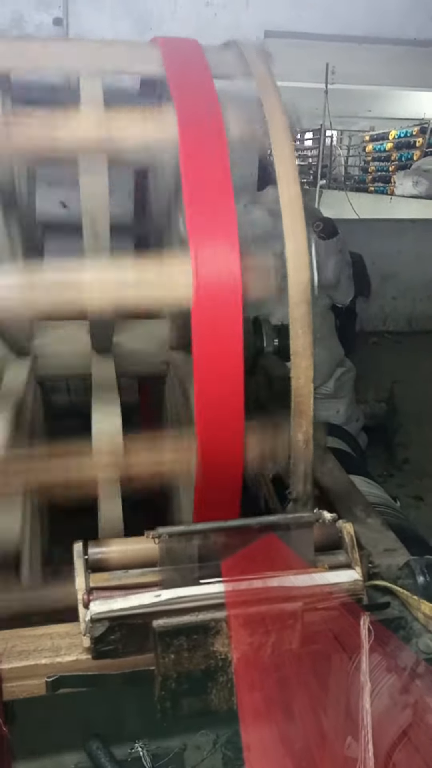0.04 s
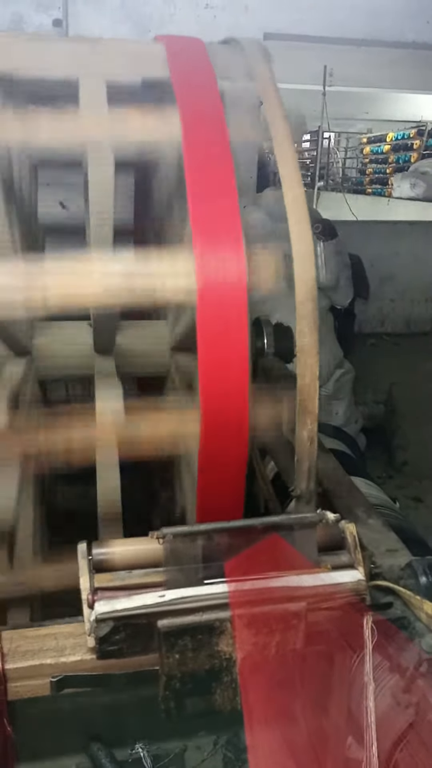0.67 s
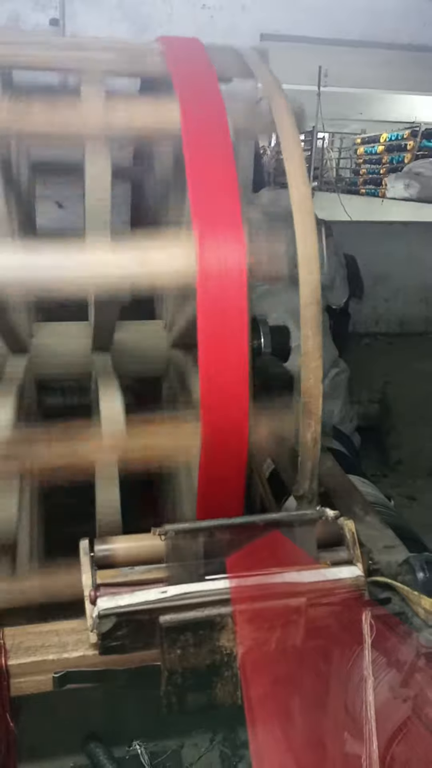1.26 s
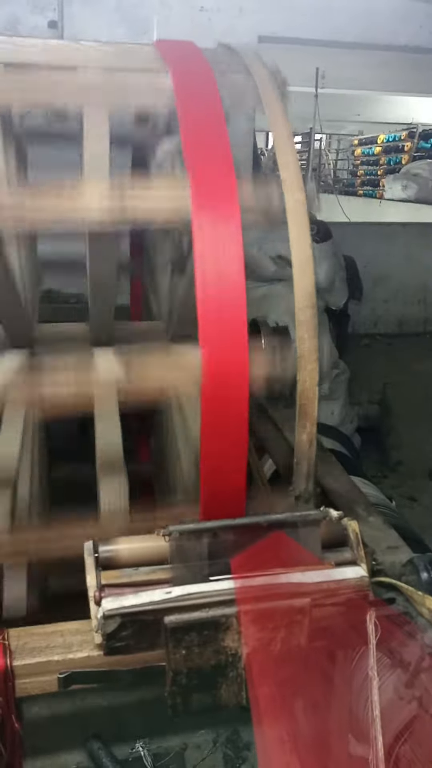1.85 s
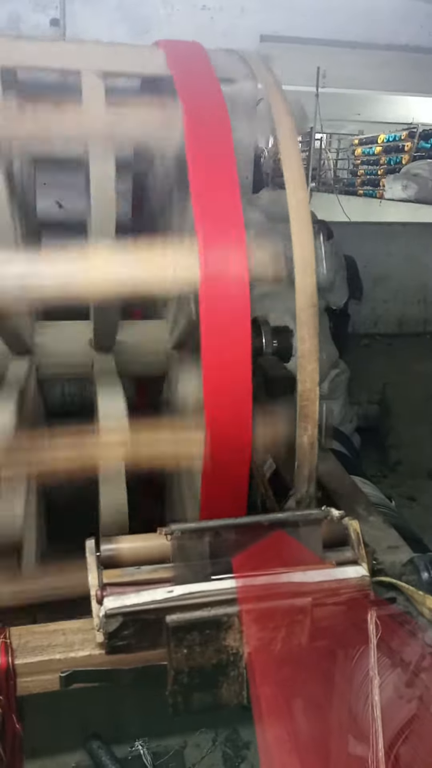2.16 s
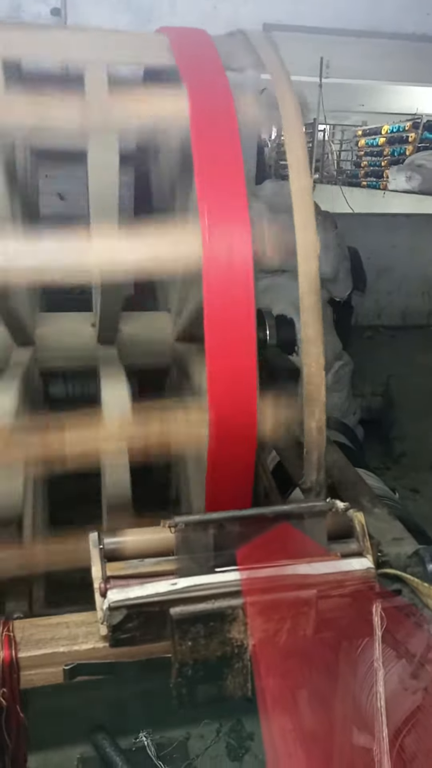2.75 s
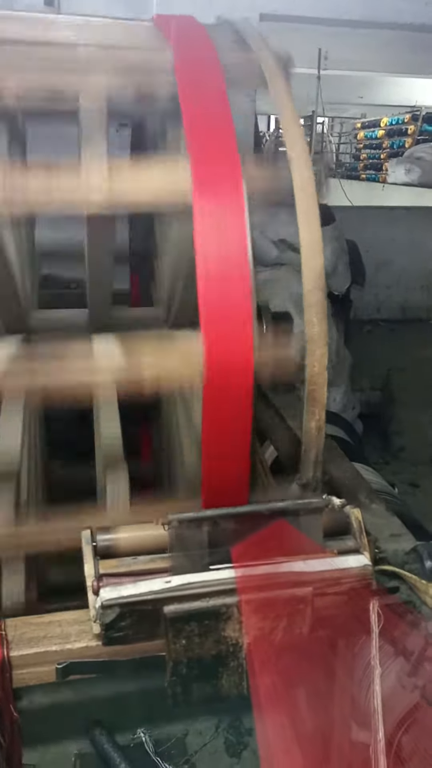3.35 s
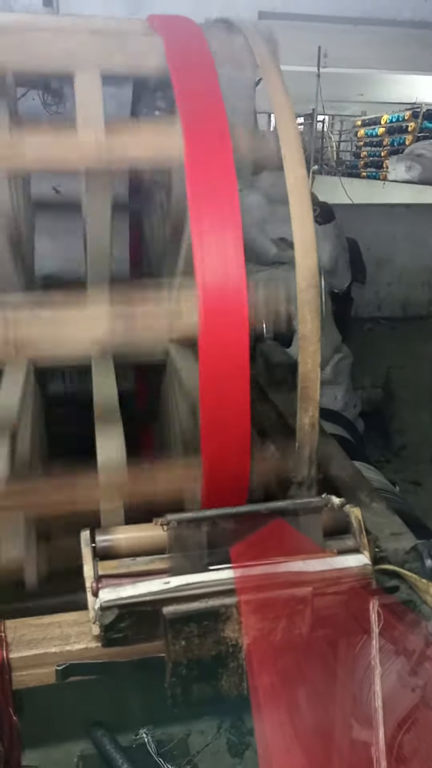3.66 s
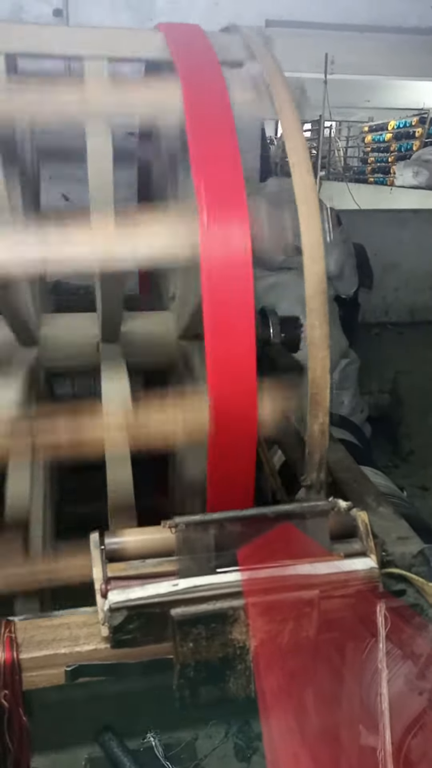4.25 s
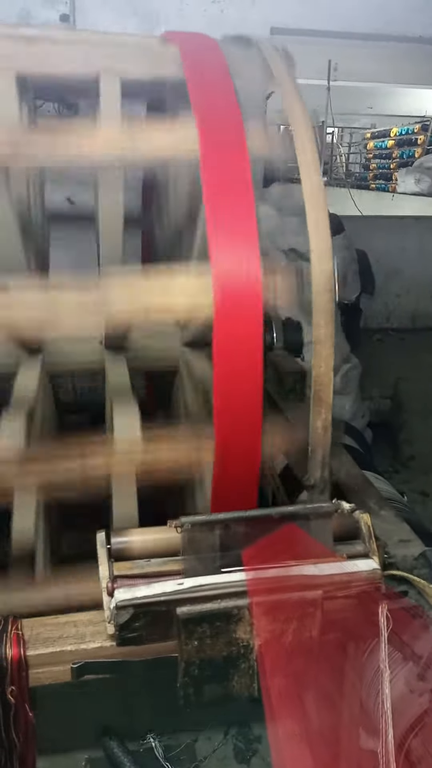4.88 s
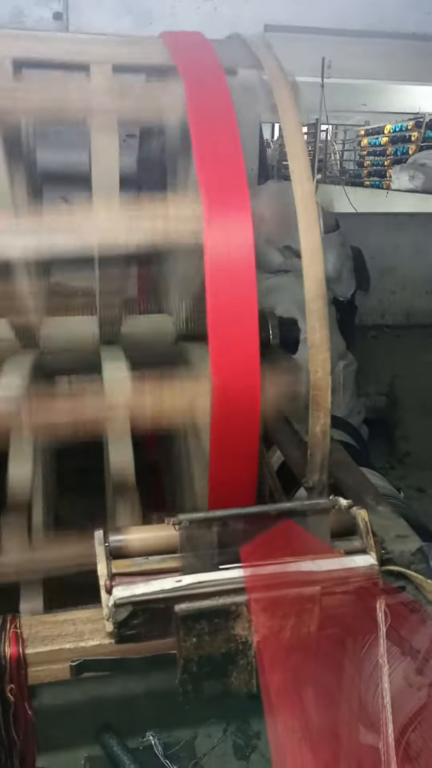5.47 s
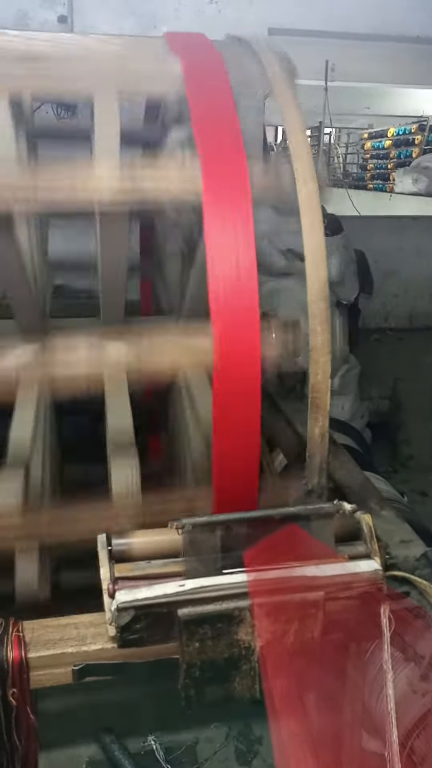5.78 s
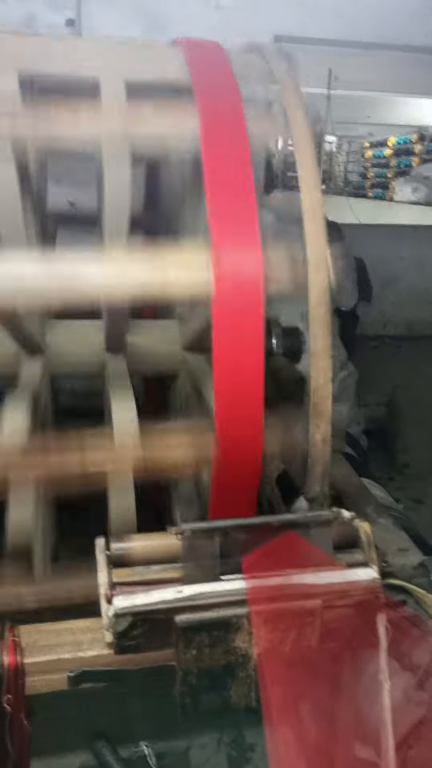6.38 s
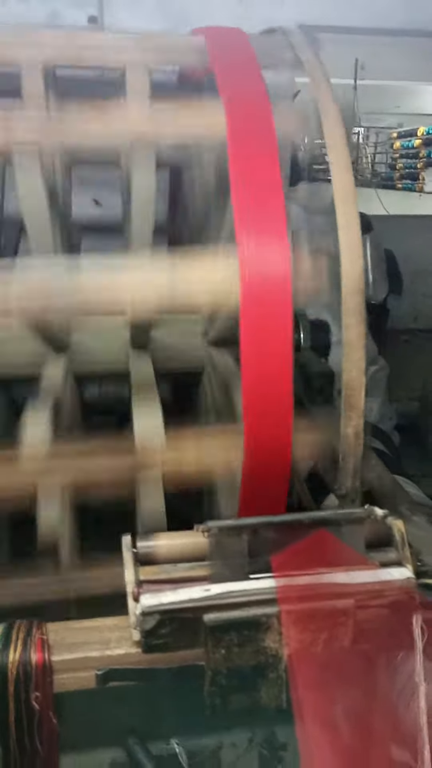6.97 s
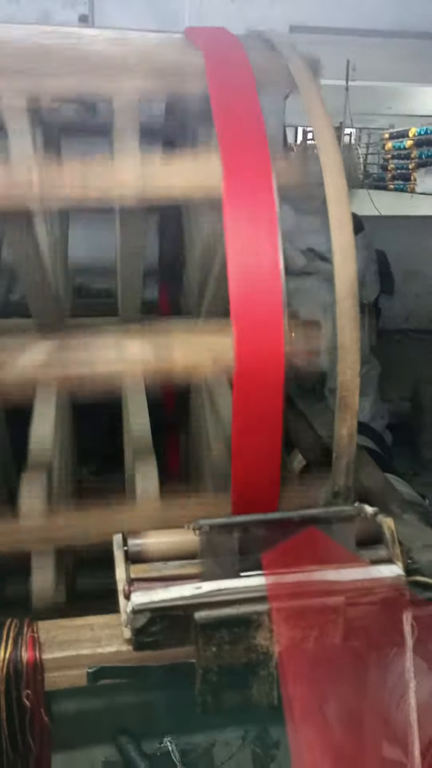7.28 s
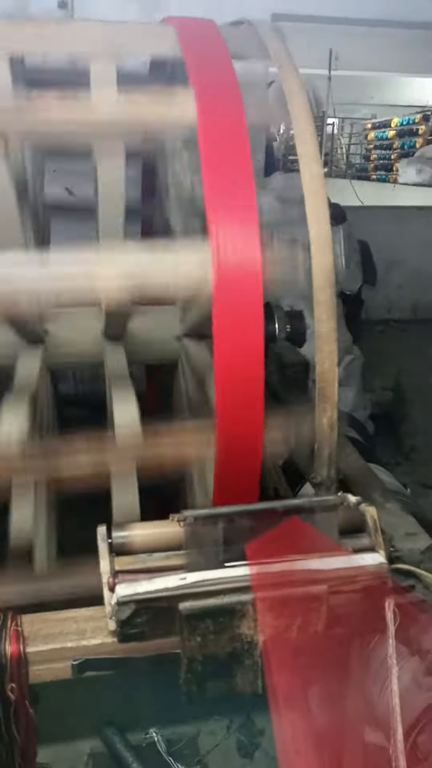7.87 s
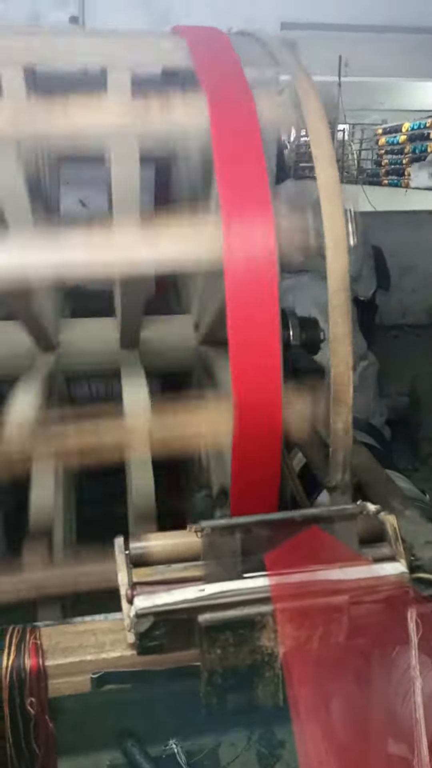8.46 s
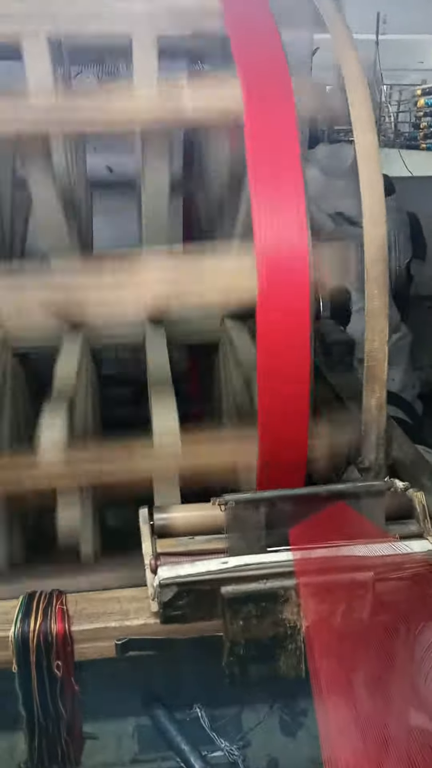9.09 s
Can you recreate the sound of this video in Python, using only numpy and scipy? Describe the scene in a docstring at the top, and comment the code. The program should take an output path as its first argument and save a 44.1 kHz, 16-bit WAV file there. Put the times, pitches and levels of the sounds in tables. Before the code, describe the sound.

A large slatted drum winds yarn in a workshop, making a continuous rushing hiss over a low roar of churned air. A little under twice a second it scrapes its steel frame, which rings briefly, with knocks, ticks and clinks of loose parts in between. Short squeaks come now and then. The microphone is close, and the tone turns slightly hollow toward the end.

```python
"""A workshop: a big slatted warping drum winds a band of yarn at about 100 turns a minute.
Once a turn it scrapes and rings the steel frame, which knocks and clinks in between. The running gear
heaves and ticks in a slightly faster cycle, so the two drift in and out of step. Yarn and bearings
rush without a break, with stray squeaks; the slats churn the air and the frame booms softly.
Late on, the phone moves and a close surface hollows the sound."""
import sys
import numpy as np
from scipy import signal
from scipy.fft import rfft, irfft
from scipy.io import wavfile
from scipy.ndimage import uniform_filter1d, map_coordinates

SR = 44100
rng = np.random.default_rng(int(sys.argv[2]) if len(sys.argv) > 2 else 0)


def to_wav(s):
    """Save 16-bit WAV."""
    ch = np.atleast_2d(s).T  # columns
    pcm = np.round(np.clip(ch, -1, 1) * 32767)  # PCM
    wavfile.write(sys.argv[1], SR, pcm.astype(np.int16))


N = 402633
T = np.arange(N) / SR
TURN_S, TURN_START_S, GEAR_S = .6012, .4035, .572
TICK_RISE_S = .003

# Noise spectra. Each row: frequency in Hz, relative density in dB.
AIR_SPECTRUM = [(20, -30), (36, -28), (62, -3), (85, -3), (150, 0.5), (205, -0.5), (330, 1), (500, -1),
                (700, -5.5), (1000, -2.5), (1600, -25.5)]
RUSH_SPECTRUM = [(450, -37), (800, -16.5), (1150, -9.5), (1360, -1.0), (1800, 0.5), (2600, -4),
                 (3300, -0.4), (5200, -6), (6700, -6.5), (8100, -14), (9200, -13), (9400, -7), (9600, -15),
                 (10200, -13.5), (12600, -27), (13900, -33), (15000, -26)]
GRIND_SPECTRUM = [(300, -15), (1000, -9.5), (1400, -3), (2700, 0), (4600, -0.5), (6300, -1), (8200, -11.5),
                  (10400, -9), (13300, -34), (15500, -24)]
YARN_SPECTRUM = [(1500, -14.5), (4500, -9.5), (6500, 7.5), (8200, -1), (10000, 2.5), (11600, -0.5),
                 (12800, -17), (13900, -11), (15000, -7)]
SNAP_SPECTRUM = [(3000, -10.5), (6500, -1.5), (8200, -2), (10000, 4), (12000, -9), (13500, -14),
                 (15300, -3.5)]
SCRAPE_SPECTRUM = [(300, -13), (1000, -10), (1400, -2), (2100, 0), (2700, 0), (3550, -1), (4500, 0),
                   (5900, 1), (6900, -1), (8200, -10), (10400, -12), (13300, -33), (15500, -19)]

# Slow drift. Each row: time in seconds, base rubbing in dB, yarn hiss in dB.
MACHINE_DRIFT = [(0, -38, -53), (2.4, -36, -48.5), (3.9, -35.5, -49), (5.3, -35.5, -50), (6.2, -36.5, -49),
                 (6.8, -35.5, -66), (7.6, -34, -55), (8.2, -35, -44), (9.13, -35.5, -51)]
# Load peaks per drum turn and gear cycle. Each row: offset in seconds, lift in dB, decay in seconds.
DRUM_LOAD_PEAKS = [(.01, 1.5, 0.058), (.25, 0.8, 0.032)]
GEAR_LOAD_PEAKS = [(.027, 3, 0.11), (.262, 1, 0.015)]
# Brief easing of the rubbing. Each row: centre in seconds, change in dB, length in seconds.
RUB_LULLS = [(0.03, -2.5, 0.045), (0.34, -2, 0.049), (1.368, -0.5, .08), (1.895, -3, .11),
             (2.128, -3, 0.071), (2.734, -5, 0.12), (3.248, -2.5, 0.12), (3.83, -5, 0.12),
             (4.397, -2, 0.083), (5.017, -3.5, .13), (5.675, -2, .08), (7.386, -2, .11), (8.485, 0, .1)]
# Frame booms. Each row: centre in seconds, pitch in Hz, relative level in dB.
FRAME_BOOMS = [(.05, 343, -44.5), (.28, 255, -45), (.575, 91, -51), (.725, 253, -44.5), (1.79, 102.3, -50),
               (1.805, 354, -42.5), (1.97, 75, -51), (2.17, 75, -53), (2.21, 130, -49), (2.66, 463, -47),
               (2.755, 141, -48), (2.93, 350, -42.5), (3.07, 306, -47.5), (2.985, 133, -47),
               (3.155, 164, -42.5), (4.64, 89.5, -49), (5.24, 510, -48), (5.25, 984, -47),
               (5.255, 157, -43), (5.43, 150, -49), (6.51, 80, -47.5), (6.6, 68, -51), (6.9, 85, -48),
               (8.70, 320, -43.5)]
# Dry bearing tones. Each row: pitch in Hz, level in dB.
BEARING_TONES = [(2115, -66), (6335, -67), (11100, -75), (12257, -77)]
# Rubbing metal. Each row: centre in seconds, pitch in Hz, level in dB, length in seconds.
METAL_SQUEAKS = [(.452, 3790, -37.5, .075), (.72, 1378, -41, .05), (1.76, 2105, -39.5, .063),
                 (3.42, 9380, -43, .06), (3.73, 6335, -35, .052), (4.328, 6335, -41.5, .04),
                 (5.2, 2164, -39, .063), (5.85, 1610, -33.5, .063), (6.372, 3610, -38, .063),
                 (6.45, 1378, -42, .063), (6.605, 11110, -46, .063), (6.63, 1370, -41, .063),
                 (8.10, 1960, -36.5, .063), (8.635, 2116, -35.5, .055), (8.70, 1395, -37, .075)]
# Ticks per drum turn and gear cycle. Each row: offset in seconds, level in dB.
DRUM_CYCLE_TICKS = [(.005, -45.5), (.25, -49), (.425, -61)]
GEAR_CYCLE_TICKS = [(.037, -50), (.062, -58), (.295, -48.5), (.397, -51), (.565, -47)]
# Yarn snapping over the guide. Each row: start in seconds, level in dB.
YARN_SNAPS = [(.047, -46), (.424, -36.5), (.885, -39), (1.2, -43), (1.565, -37), (3.411, -42), (3.828, -38),
              (4.034, -35.5), (4.267, -36), (4.612, -39), (5.184, -38), (5.781, -36), (6.331, -42),
              (8.045, -37), (8.232, -35)]
# Struck steel: loose parts clink, and the frame itself rings near 2.5 kHz at some scrapes. Each row: start in
# seconds, pitch in Hz, level in dB, T60 in seconds.
STEEL_CLINKS = [(.115, 4530, -43, .2), (.125, 2900, -43, .2), (.615, 6212, -41, .2), (.885, 2830, -40, .15),
                (1.025, 2379, -32.5, .19), (1.03, 5190, -38.5, .15), (1.14, 4330, -42, .22),
                (1.195, 3510, -41, .17), (1.765, 4630, -41, .2), (2.235, 1938, -39, .2),
                (2.814, 2625, -33, .22), (2.882, 3058, -38, .2), (2.895, 4737, -38.5, .33),
                (2.92, 3220, -38.5, .2), (3.425, 5190, -40, .15), (3.447, 4680, -40, .17),
                (3.465, 5609, -39, .18), (3.485, 4447, -36, .2), (4.02, 2670, -37, .16),
                (4.035, 2089, -32, .18), (4.028, 3133, -35.5, .22), (4.033, 4737, -38, .17),
                (4.05, 4436, -37, .2), (4.075, 1658, -38, .28), (4.125, 4450, -37, .28),
                (4.145, 3714, -37, .3), (4.625, 3230, -37.5, .2), (4.637, 2584, -36, .22),
                (4.62, 5600, -39.5, .16), (4.725, 3200, -37.5, .28), (5.225, 2541, -37.5, .18),
                (5.24, 4188, -39, .2), (5.275, 3310, -37, .33), (5.39, 3240, -41, .25),
                (5.818, 2541, -40, .17), (5.962, 4737, -39.5, .22), (6.14, 6008, -39.5, .18),
                (6.425, 4748, -38, .2), (6.445, 2575, -35.5, .22), (6.472, 4608, -38.5, .2),
                (7.033, 2575, -37, .22), (7.632, 2615, -31.5, .22), (7.63, 5986, -36, .16),
                (8.255, 3230, -37.5, .3)]
# Steel frame modes. Each row: frequency in Hz, relative level in dB, T60 in seconds.
FRAME_MODES = [(1387, -3, 0.24), (1657, -1.5, 0.23), (2120, -2.5, 0.13), (2580, 0, 0.19), (3130, -8, 0.16),
               (3260, -3, 0.25), (3760, -5, 0.13), (4390, -5, 0.22), (4715, -2, .22), (5250, -6, .15),
               (5620, -8, 0.25), (5990, -3, .18), (6100, -13, .16)]
# Knocks between scrapes. Each row: start in seconds, level in dB, decay in seconds.
FRAME_KNOCKS = [(.505, -35, 0.079), (.66, -37, .05), (1.075, -38, .02), (1.4, -37, .05), (1.74, -37, .03),
                (1.975, -39, 0.056), (2.268, -41, .025), (2.485, -38.5, 0.07), (3.1, -37, 0.044),
                (3.148, -41, .025), (3.585, -44, 0.028), (3.685, -37, .045), (4.49, -39, .025),
                (4.675, -40, 0.016), (4.725, -45, .025), (5.18, -34, 0.035), (5.5, -42, .08),
                (6.3, -35, .03), (6.357, -34.5, 0.028), (6.891, -44, .03), (7.44, -41, .03),
                (7.545, -38, .05), (7.702, -38, .025), (8.08, -42, .03), (8.361, -35, 0.034),
                (8.68, -36.5, 0.041)]
# One scrape a turn. Each row: start in seconds, level in dB, rise in seconds, decay in seconds.
DRUM_SCRAPES = [(.406, -35.5, 0.023, .025), (1.013, -30, 0.016, 0.04), (1.612, -33, 0.0083, 0.057),
                (2.192, -32.5, 0.007, 0.092), (2.809, -31, .006, 0.1), (3.408, -33.5, 0.0073, 0.065),
                (4.014, -28, 0.023, 0.038), (4.6, -33, .026, 0.04), (5.215, -31.5, .014, 0.059),
                (5.798, -33, 0.036, 0.049), (6.406, -32, 0.027, 0.043), (7.012, -33.5, 0.022, 0.055),
                (7.628, -30, 0.0034, .032), (8.222, -31, 0.01, 0.035), (8.835, -33.5, 0.01, .04)]
# Hard surfaces near the phone. Each row: time in seconds, echo lag in ms, signed echo gain,
# treble relative to bass in dB.
SURFACE_ECHO = [(0, .11, 0.13, 0.5), (1.3, 0.09, 0.13, 0), (2.1, 0.097, 0.026, 0),
                (6.1, 0.55, 0.0061, -0.5), (6.5, 0.47, -0.13, 0), (7.1, 0.47, -0.13, -1.5),
                (7.6, 0.41, -0.1, -2.3), (8.0, 0.34, -0.16, -2.5), (8.4, 0.35, -0.17, -3),
                (9.13, 0.35, -0.067, -5.5)]
# Dips cut by the close surface. Each row: time in seconds, dip in Hz, depth 0-1, upper dip depth 0-1.
SURFACE_DIPS = [(6.2, 2400, 0, 0.1), (6.7, 2550, .25, 0), (7.05, 2480, 0.34, 0), (7.4, 2760, 0.5, 0),
                (7.8, 2970, .3, 0), (8.2, 3170, .1, .3), (8.7, 3300, .2, 0.27), (9.13, 3400, 0.4, .3)]


def undb(db):
    """Decibels to gain."""
    return 10 ** (np.asarray(db) / 20)


def unit(x):
    """Scale to rms 1."""
    return x / np.sqrt(np.mean(x ** 2))


def lowpass(x, order, hz):
    """Zero-phase low-pass."""
    return signal.sosfiltfilt(signal.butter(order, hz, fs=SR, output="sos"), x)


def band(x, hz, width_hz):
    """Band-pass around a moving centre."""
    carrier = np.exp(2j * np.pi * np.cumsum(hz) / SR)
    return 2 * np.real(carrier * lowpass(x / carrier, 1, width_hz / 2))


def curves(table):
    """Table columns, interpolated over time."""
    times_s, *columns = np.transpose(table)
    return [np.interp(T, times_s, column) for column in columns]


def walk(rate_hz):
    """Smoothed random steps; spread near 1."""
    hold = int(SR / rate_hz)
    steps = np.repeat(rng.standard_normal(N // hold + 2), hold)[rng.integers(hold):][:N]
    return 1.3 * uniform_filter1d(uniform_filter1d(steps, hold), hold)


def colour(x, spectrum):
    """Filter by (Hz, dB) points; rms 1."""
    hz, db = np.transpose(spectrum)
    bins_hz = np.arange(N // 2 + 1) * SR / N + 1
    gain = undb(np.interp(np.log(bins_hz), np.log(hz), db))
    return unit(irfft(rfft(x) * gain, N))


def noise(spectrum):
    """Coloured noise; rms 1."""
    return colour(rng.standard_normal(N), spectrum)


def flicker(x, low_hz, high_hz, depth_db, rate_hz, count):
    """Overlapping bands rise and fall independently; rms 1."""
    bins_hz = np.arange(N // 2 + 1) * SR / N + 1
    position = np.interp(np.log(bins_hz), np.log([low_hz, high_hz]), [0, count - 1])
    spectrum = rfft(x)
    bands = (irfft(spectrum * np.maximum(1 - np.abs(position - k), 0), N) for k in range(count))
    return unit(sum(part * undb(depth_db * walk(rate_hz)) for part in bands))


def wavering_tone(hz, bend, rate_hz):
    """Sine whose pitch wanders by the fraction bend."""
    return np.sin(2 * np.pi * np.cumsum(hz * (1 + bend * walk(rate_hz))) / SR)


def stroke(t, rise_s, decay_s):
    """Linear rise from t = 0, exponential fall."""
    return np.clip(t / rise_s, 0, 1) * np.exp(-np.maximum(t - rise_s, 0) / decay_s)


def cycles(drum_rows, gear_rows):
    """Rows with each offset replaced by the time since it last came round."""
    drum = [((T - TURN_START_S - s) % TURN_S, *rest) for s, *rest in drum_rows]
    gear = [((T - s) % GEAR_S, *rest) for s, *rest in gear_rows]
    return drum + gear


def slips(per_s, spread_db):
    """Tiny friction slips of uneven size; rms 1."""
    impulses = (rng.random(N) < per_s / SR) * rng.choice([-1, 1], N)
    return unit(impulses * undb(spread_db * rng.standard_normal(N)))


def swells(rows, wander_hz, rough):
    """Narrow resonances swell and die: part tone, part rasp."""
    out = np.zeros(N)
    phase_drift = np.cumsum(wander_hz * walk(90)) / SR
    flutter = np.sqrt(1 - rough) + np.sqrt(rough / 2) * (walk(170) + 1j * walk(170))
    for centre_s, hz, db, length_s in rows:
        near = np.abs(T - centre_s) < 2 * length_s
        t = T[near] - centre_s
        tone = np.sqrt(2) * np.imag(flutter[near] * np.exp(2j * np.pi * (hz * t + phase_drift[near])))
        out[near] += undb(db) * np.exp(-(2 * t / length_s) ** 2) * tone
    return out


def rings(rows, max_split_hz=56, twin_gain=.51, rise_s=.0044):
    """Struck steel: each fading tone beats with a weaker neighbour."""
    out, t = np.zeros(N + SR), T[:SR // 4]
    attack = 1 - np.exp(-t / rise_s)
    for start_s, hz, db, t60_s in rows:
        phase, twin_phase, split = rng.random(3)
        twin_hz = hz + max_split_hz * (2 * split - 1)
        tone = np.sin(2 * np.pi * (hz * t + phase))
        twin = twin_gain * np.sin(2 * np.pi * (twin_hz * t + twin_phase))
        i = min(int(start_s * SR), N - 1)
        out[i:i + len(t)] += np.sqrt(2) * (tone + twin) * attack * undb(db - 60 * t / t60_s)
    return out[:N]


def rubbing():
    """Rubbing strength in dB: drum and gear heaves add in power, with brief lulls."""
    heaves = sum((undb(db) ** 2 - 1) * stroke(t, .021, decay_s)
                 for t, db, decay_s in cycles(DRUM_LOAD_PEAKS, GEAR_LOAD_PEAKS))
    lulls_db = sum(db * np.exp(-(2 * (T - s) / length_s) ** 2) for s, db, length_s in RUB_LULLS)
    base_db, _ = curves(MACHINE_DRIFT)
    return base_db + 10 * np.log10(1 + heaves) + lulls_db + .51 * walk(18)


def churned_air(load_db):
    """Slats churn the air: a low roar that heaves with the load, its deepest part in puffs."""
    air = flicker(noise(AIR_SPECTRUM), 66, 690, depth_db=2.5, rate_hz=13, count=6)
    puffs = lowpass(air, 2, hz=90) * (undb(2.1 * walk(6.6) - 3.5) - 1)
    return (air + puffs) * undb(-50 + .34 * load_db)


def frame_booms(low_hz=109.6, high_hz=480, length_s=.065):
    """The frame booms softly, with a few fainter strays at random."""
    strays = [(when * N / SR, low_hz * (high_hz / low_hz) ** pitch, -50 - 5 * size)
              for when, pitch, size in rng.random((8, 3))]
    rows = [(*row, length_s) for row in FRAME_BOOMS + strays]
    return undb(-2.5) * swells(rows, wander_hz=25.1, rough=.56)


def bearing():
    """A dry bearing sings faintly and unsteadily."""
    return sum(undb(db + 3.2 * walk(13)) * np.sqrt(2) * wavering_tone(hz, bend=.00593, rate_hz=150)
               for hz, db in BEARING_TONES)


def rush(load_db):
    """Threads and bearings rub nonstop; high load adds brighter, stuttering grinding."""
    steady = flicker(noise(RUSH_SPECTRUM), 1080, 9000, depth_db=1.02, rate_hz=22, count=7)
    grinding = noise(GRIND_SPECTRUM) * undb(-46 + 1.66 * load_db + 2.7 * walk(40))
    return steady * undb(-35.5 + .62 * load_db + .5 * walk(25)) + grinding


def squeaks():
    """Rubbing metal squeaks briefly."""
    return swells(METAL_SQUEAKS, wander_hz=25.97, rough=.38)


def yarn_hiss():
    """Yarn hisses through reed and guide; ticks come round with drum and gear."""
    ticks = sum(undb(db) * stroke(t, TICK_RISE_S, decay_s=.018)
                for t, db in cycles(DRUM_CYCLE_TICKS, GEAR_CYCLE_TICKS))
    _, hiss_db = curves(MACHINE_DRIFT)
    envelope = undb(hiss_db + 2 * walk(45)) + ticks * undb(2.1 * walk(16))
    return envelope * noise(YARN_SPECTRUM)


def yarn_snaps(load_db, rise_s=.005, decay_s=.008, crackle_per_s=36):
    """Taut threads jump on the guide: sharp ticks over a crackle that follows the load."""
    sharp = sum(undb(db) * stroke(T - s, rise_s, decay_s) for s, db in YARN_SNAPS)
    jumps = np.abs(slips(crackle_per_s, spread_db=3.5)) * np.sqrt(crackle_per_s / SR)
    crackle = signal.fftconvolve(jumps, stroke(T[:SR // 10], rise_s, decay_s))[:N]
    return (sharp + undb(load_db - 47.5) * crackle) * noise(SNAP_SPECTRUM)


def clinks(starts_s, rub_db):
    """Small steel parts of random pitch, size and damping; louder under hard rubbing."""
    pitch, smallness, sustain = rng.random((len(starts_s), 3)).T
    hz = 1900 + 3500 * pitch
    db = np.interp(starts_s, T, rub_db) - 3.5 - 12 * smallness - 3 * pitch
    t60_s = .087 + .15 * sustain
    return rings(zip(starts_s, hz, db, t60_s))


def jingle(rub_db, count=260):
    """Loose parts shake all the time."""
    return clinks(rng.random(count) * N / SR, rub_db)


def clank(rub_db, per_scrape=6):
    """Each scrape shakes out a flurry of clinks."""
    starts_s = np.repeat([s for s, *_ in DRUM_SCRAPES], per_scrape)
    lags_s = .0087 + rng.exponential(.05, len(starts_s))
    return clinks(starts_s + lags_s, rub_db)


def frame_singing(force, rub_db):
    """Rubbing sustains the frame's modes; the moving contact feeds each unevenly and bends its pitch."""
    drive = undb(-19.5) * force + undb(rub_db - 23)
    out = np.zeros(N)
    for hz, db, t60_s in FRAME_MODES:
        pole = np.exp(-np.log(1000) / t60_s / SR)
        push = drive * undb(4.8 * walk(3.09)) * rng.standard_normal(N)
        amplitude = np.sqrt(1 - pole ** 2) * signal.lfilter([1], [1, -pole], push)
        out += undb(db) * amplitude * wavering_tone(hz, bend=.006, rate_hz=6)
    return out


def frame_strikes(ring_db=-14.5, scatter_db=2.5):
    """Each scrape and knock strikes all frame modes in a new mix."""
    blows = [(s + rise_s / 2, db) for s, db, rise_s, _ in DRUM_SCRAPES]
    blows += [(s, db) for s, db, _ in FRAME_KNOCKS]
    rows = []
    for start_s, blow_db in blows:
        for hz, mode_db, t60_s in FRAME_MODES:
            size, bend = rng.standard_normal(2)
            db = blow_db + mode_db + ring_db + scatter_db * size
            rows.append((start_s, hz * (1 + .0073 * bend), db, t60_s))
    return rings(rows)


def clack(relative_db=-12, lag_s=.0037):
    """One crisp snap just after each scrape's peak, scaled to it."""
    envelope = sum(undb(db + relative_db) * stroke(T - s - rise_s - lag_s, TICK_RISE_S, decay_s=.008)
                   for s, db, rise_s, _ in DRUM_SCRAPES)
    return envelope * noise(YARN_SPECTRUM)


def contact_force():
    """Once a turn the drum bears on its rubbing spot, chatters and lets go; the frame knocks between."""
    scrapes = sum(undb(db) * stroke(T - s, rise_s, decay_s) for s, db, rise_s, decay_s in DRUM_SCRAPES)
    knocks = sum(undb(db) * stroke(T - s, .005, decay_s) for s, db, decay_s in FRAME_KNOCKS)
    return (scrapes + knocks) * undb(walk(110))


def drum_scrape(force, blur_s=.0043):
    """Chattering slips, blurred by first reflections off drum and walls."""
    t = T[:SR // 20]
    reflections = rng.standard_normal(len(t)) * np.exp(-t / blur_s)
    chatter = signal.fftconvolve(slips(per_s=9000, spread_db=2), reflections)[:N]
    return force * colour(chatter, SCRAPE_SPECTRUM)


def surface_echo(x):
    """A very short echo combs the sound as the phone shifts; the balance tilts away from the treble."""
    lag_ms, echo_gain, treble_db = curves(SURFACE_ECHO)
    low = lowpass(x, 4, hz=2800)
    tilted = (low + undb(treble_db) * (x - low)) * undb(-.35 * treble_db)
    return tilted + echo_gain * map_coordinates(tilted, [(T - lag_ms / 1000) * SR], order=3)


def surface_hollow(x, width_hz=710):
    """The phone nears a surface: a dip and a resonance above it climb, then a higher dip opens."""
    dip_hz, depth, upper_depth = curves(SURFACE_DIPS)
    dip = band(x, dip_hz, width_hz)
    resonance = .42 * band(x, 1.29 * dip_hz, width_hz)
    upper_dip = band(x, np.full(N, 5300), width_hz=990)
    return x + depth * (resonance - dip) - upper_depth * upper_dip


def scene():
    """The whole machine, same in both channels."""
    rub_db = rubbing()
    load_db = rub_db - np.mean(rub_db)
    force = contact_force()
    metal = frame_singing(force, rub_db) + frame_strikes() + jingle(rub_db) + clank(rub_db) + bearing()
    rung_metal = rings(STEEL_CLINKS) + squeaks()
    friction = rush(load_db) + drum_scrape(force) + clack() + yarn_hiss() + yarn_snaps(load_db)
    roar = churned_air(load_db) + frame_booms()
    machine = surface_hollow(surface_echo(friction + metal)) + rung_metal + roar
    return np.array([machine, machine])


def record(dry):
    """The phone cuts below 45 Hz and above 15750 Hz."""
    thin = signal.sosfilt(signal.butter(2, 45, "highpass", fs=SR, output="sos"), dry)
    return signal.sosfilt(signal.ellip(10, .2, 70, 15750, fs=SR, output="sos"), thin)


dry = scene()
out = record(dry)
to_wav(out)
```